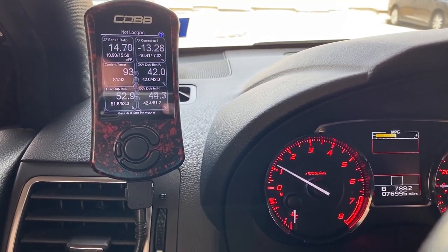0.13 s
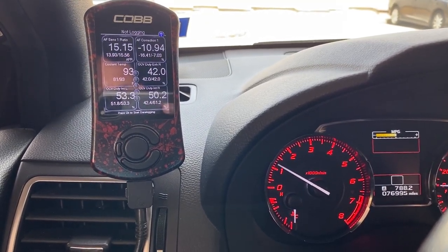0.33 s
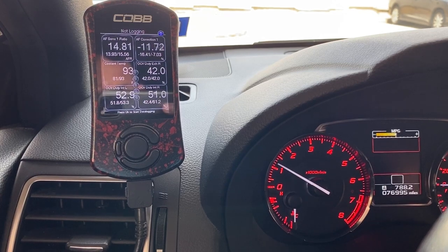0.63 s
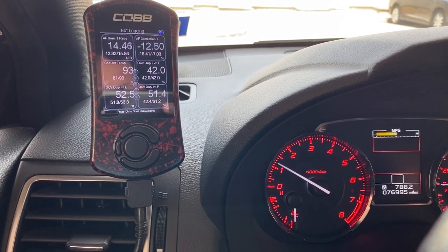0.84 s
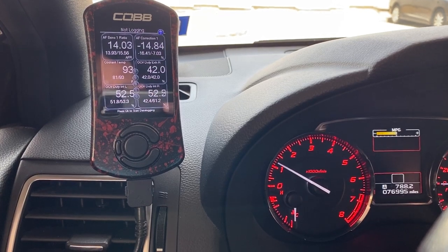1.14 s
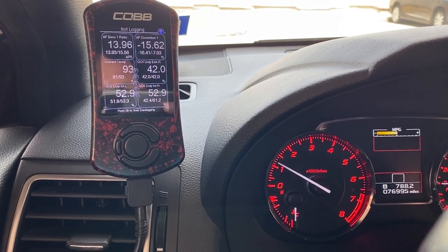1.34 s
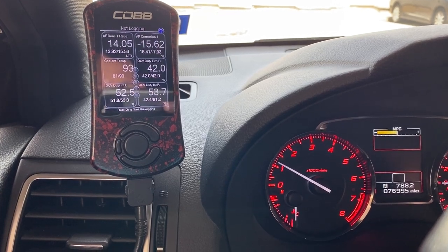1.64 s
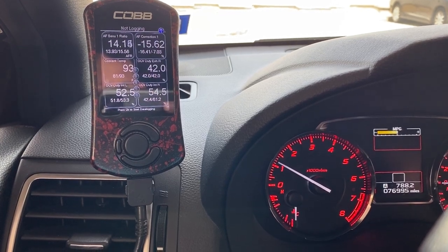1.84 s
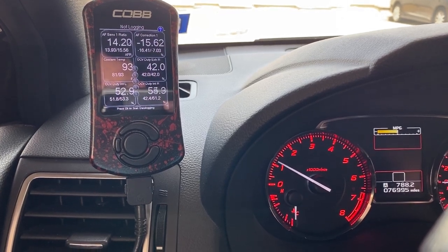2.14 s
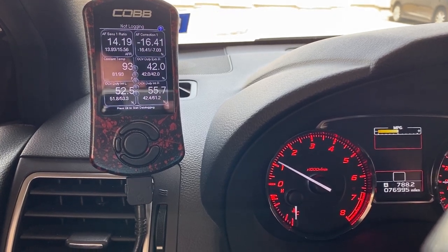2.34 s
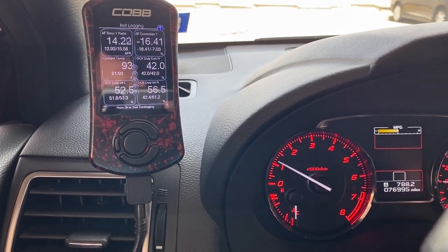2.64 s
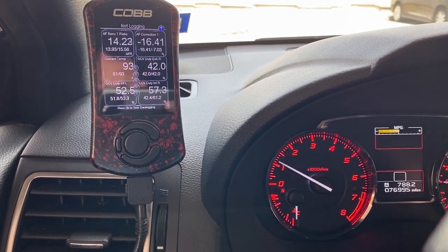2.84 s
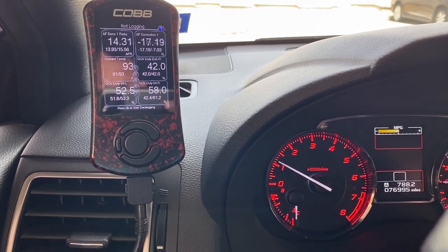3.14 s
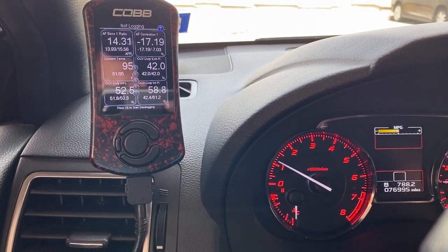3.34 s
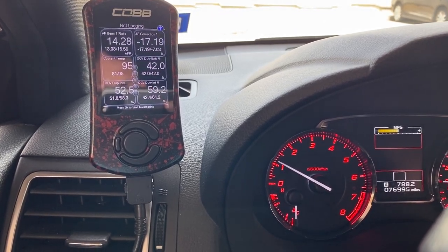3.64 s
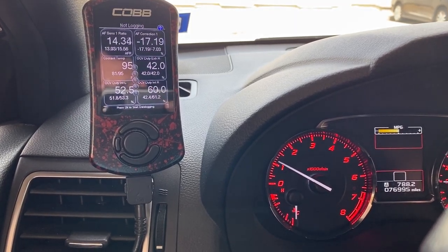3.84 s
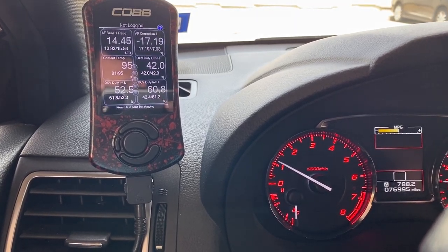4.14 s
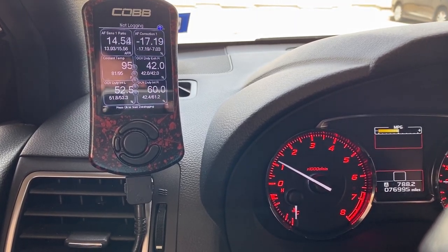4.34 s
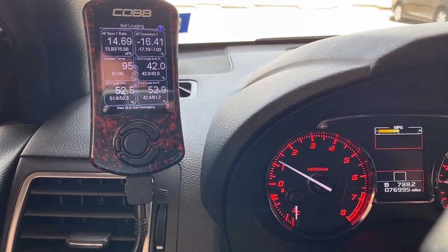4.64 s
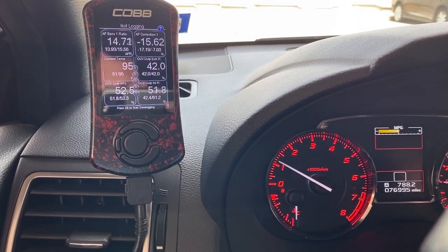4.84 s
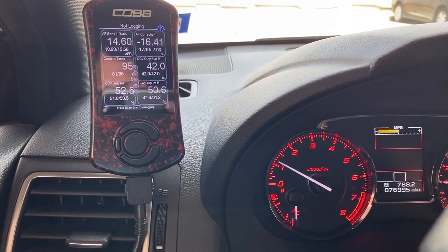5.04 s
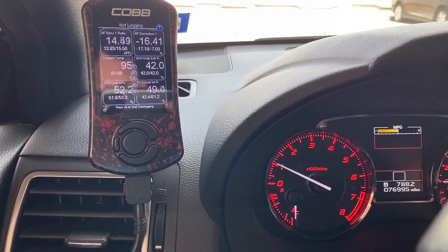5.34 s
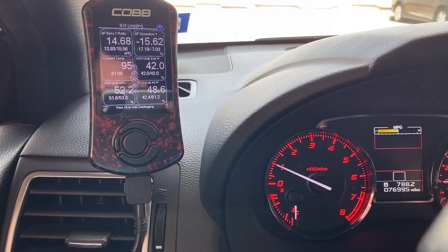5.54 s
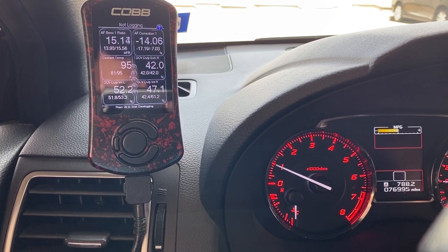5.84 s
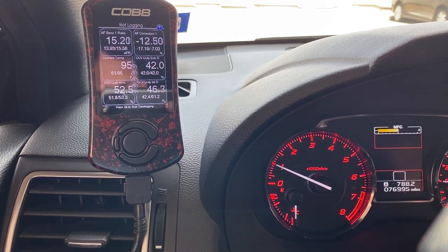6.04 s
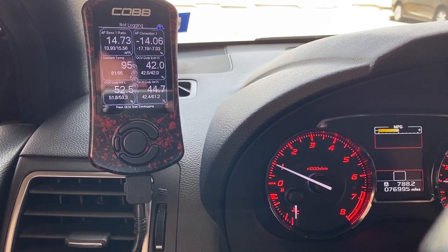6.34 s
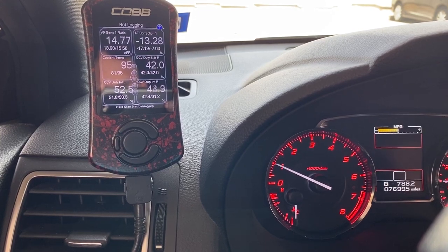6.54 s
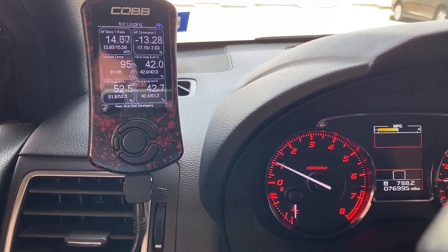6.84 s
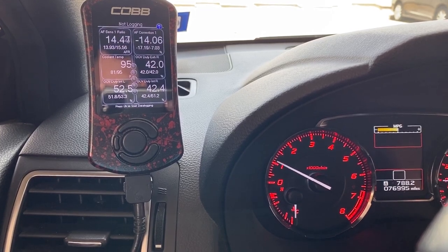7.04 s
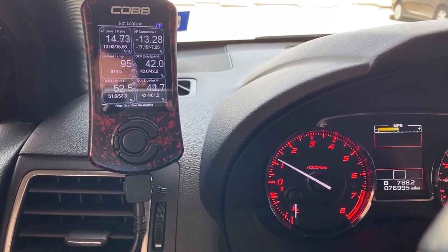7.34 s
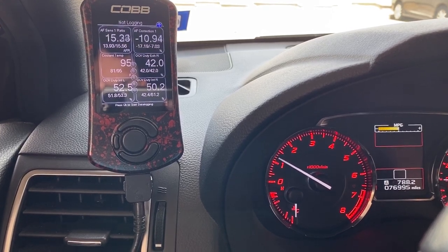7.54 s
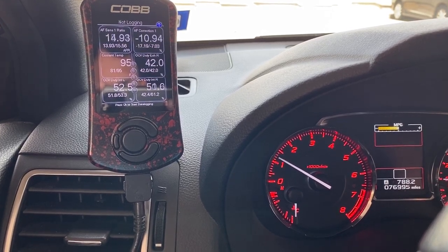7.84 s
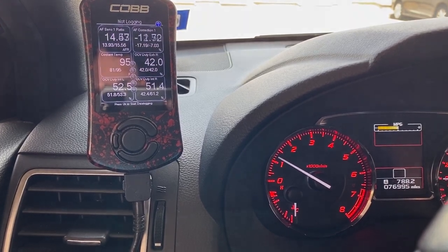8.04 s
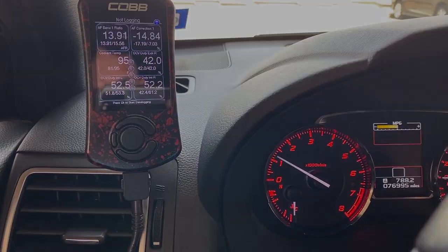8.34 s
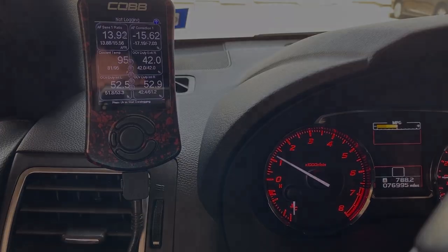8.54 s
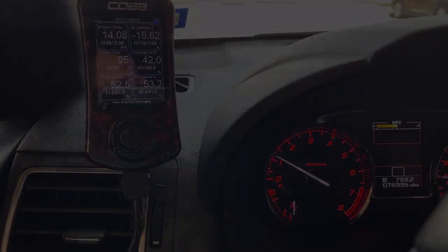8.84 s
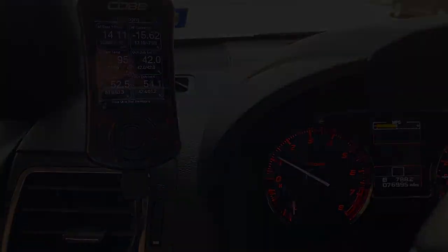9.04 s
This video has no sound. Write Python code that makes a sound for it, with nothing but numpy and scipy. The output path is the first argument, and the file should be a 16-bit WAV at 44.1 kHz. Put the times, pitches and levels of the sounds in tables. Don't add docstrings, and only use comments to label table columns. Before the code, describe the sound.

Inside a parked car, a four-cylinder engine throbs at a fast idle, deep and boomy through the cabin, with knocking, belt whirr, a faint turbo moan and injector ticks ahead. It slowly eases, then around five seconds drops and stumbles unevenly, loose trim buzzing briefly, before catching near seven seconds and steadying. Small birds chirp faintly outside. Phone microphone at the driver's seat.

```python
import sys
import numpy as np
from scipy import signal
from scipy.fft import rfft, irfft
from scipy.io import wavfile
from scipy.ndimage import uniform_filter1d

SR = 44100
rng = np.random.default_rng(int(sys.argv[2]) if len(sys.argv) > 2 else 0)


def nominal_scale(level):
    x = np.asarray(level, float) / 20
    return 10 ** x


def digitize_waveform(pressure):
    field = np.atleast_2d(pressure).T
    bounded = np.clip(field, -1, 1)
    quanta = np.round(bounded * 32767).astype(np.int16)
    wavfile.write(sys.argv[1], SR, quanta)


N = 405279
T = np.arange(N) / SR
LEAD = SR // 5
IDLE_HZ, TURBO_REST_HZ = 39, 550
RATTLE_HZ = 65

# time in seconds, firing rate in Hz.
SPEED = [(0.0, 40.81), (0.3, 40.85), (1.22, 39.29), (1.81, 39.15), (2.24, 38.34), (2.73, 38.94),
         (3.26, 38.32), (3.68, 38.36), (4.49, 39.85), (4.87, 38.86), (5.37, 33.03), (5.55, 32.45),
         (6.21, 33.55), (6.68, 35.21), (7.25, 40.46), (7.58, 41.27), (8.68, 39.07), (9.19, 38.56)]
# time in seconds, combustion effort in dB, roughness 0-1.
LOAD = [(0, 2.5, 0), (.6, 1, 0.5), (1.3, 0.4, .1), (2.3, -0.5, 0.2), (3.4, 0, .15), (4.2, 0.5, 0.1),
        (4.9, 0.5, 0.1), (5.1, 1.5, .75), (5.6, 4, 0.5), (5.9, 4, .55), (6.5, 1.5, 0.7), (7.05, 2.5, 0.8),
        (7.25, 1.5, .05), (7.6, 1, .05), (8, 1.5, .4), (9.19, -0.1, 0.2)]
# time in seconds, loss 0-1.
MISFIRES = [(4.85, 0.5), (5.052, 1), (5.159, 0.96), (5.27, 0.8), (5.511, 1), (5.62, 0.3), (5.76, 0.98),
            (5.87, 0.2), (5.99, 0.5), (6.12, 1), (6.23, 0.65), (6.499, 0.8), (6.93, .4)]
CYLINDERS = [
    0.34,
    -0.24,
    -4.5,
    -1,
]
# frequency in Hz, gain in dB.
EXHAUST_PATH = [(15, -93.5), (28, -54), (36, -37.5), (46, -35.5), (60, -26.5), (90, -31), (140, -32.5),
                (190, -49.5), (260, -62), (450, -65), (700, -73), (1100, -81.5), (3000, -120)]
# frequency in Hz, width in Hz, height in dB (negative = cancellation).
BOOMS = [(39.75, 0.68, -13), (44.3, 1.2, -9), (49.7, 15, 5.5), (55.7, 5.7, 7.5), (70.57, 12, 11),
         (79.67, 5.45, 6), (84.67, 4.1, -7), (126.7, 7, 8.5), (153.94, 10, 15), (159.5, 3, -18.5),
         (170.9, 11.16, 20), (178.1, 8, 6), (201.8, 13.3, 12), (233.54, 10.6, 21.5), (243.6, 2, 9.5),
         (277.8, 16, 12.5), (307.1, 12, 18.5), (347.3, 9.1, 12.5), (361.9, 25, 13.5), (402.9, 26, 19.5),
         (464.3, 8.3, 15.5), (543, 13, 18.5), (585.5, 15, 18), (654, 35, 17.5)]
# trend rows of frequency in Hz, gain in dB;
# then mode rows of frequency in Hz, width in Hz, height in dB.
MOUNTS = [(20, -62.5), (45, -40), (65, -44.5), (100, -80), (400, -130)], [(55.7, 5.7, 17)]
# time in seconds, moan in Hz.
TURBO = [(0, 667), (.35, 680), (1.4, 594), (2.6, 522), (3.6, 499), (6.3, 527.3), (7, 561), (7.35, 639),
         (8, 662), (9.19, 556)]
# frequency in Hz, level in dB per Hz.
WHIRR = [(19, -30), (29, -14.5), (100, -10), (200, -9), (270, -22), (430, -19.5), (700, -22), (1150, -32.5),
         (2070, -34.5), (3300, -40.5), (5500, -44.5), (6800, -55), (11500, -60.5), (15700, -56.5)]
# frequency in Hz, width in Hz, height in dB.
PANELS = [(172, 30, -2.5), (208, 7.3, -6.5), (251.6, 12, -10), (289, 10, -5), (327, 8.3, -9),
          (370, 6.7, -0.5), (444, 19, -14), (483, 15, 5), (519, 17, -7.5), (571.4, 32, 5.5), (634, 13, -5),
          (650, 17, 6), (754, 29, -5), (854, 65, 7), (1002, 42, 9.5), (1283, 100, 4), (1593, 52, 5),
          (1743, 56, 7.5), (1890, 20, 0), (2040, 61, -6.5), (2236, 54, -1.5), (2370, 22, -2),
          (2753, 28, -1.5), (2965, 45, 3.5), (3900, 530, 1), (7070, 44, 3), (7400, 43, 6), (8050, 470, 4),
          (10100, 300, 5)]
KNOCK_LAW = -1.6, 1, 1.2, 0.38
WHIRR_LAW = -56.5, 0.1149, 0.54, 0.0156
MOAN_LAW = -50.5, 0, 1.8, .2
# start in seconds, length in seconds, level in dB.
BUZZES = [(5.039, 0.079, -40.5), (5.15, 0.088, -38), (5.268, 0.055, -38.5), (5.51, 0.025, -47),
          (5.751, 0.045, -38.5), (5.86, 0.045, -48.5), (6.87, .04, -55)]
# frequency in Hz, width in Hz, height in dB.
DASH = [(584, 210, 30), (830, 130, 12.5), (906, 140, 15.3), (996, 49, 24), (1680, 210, 14)]
# frequency in Hz, level in dB.
WHINES = [(5534, -81), (6094, -87), (10013, -86), (15617, -92)]
# start in seconds, length in seconds, start pitch in Hz, end pitch in Hz, level in dB.
CHIRPS = [(0.343, .05, 4550, 4600, -59), (0.405, 0.063, 4250, 4350, -49), (.49, 0.064, 3900, 2950, -58),
          (1.44, 0.068, 4600, 4900, -63), (1.992, 0.073, 4450, 4350, -53), (2.056, .07, 3780, 2930, -56.5),
          (2.17, 0.1, 5100, 5250, -62), (2.235, .09, 4150, 4440, -62), (3.231, 0.079, 4200, 4370, -58),
          (4.62, 0.1, 5300, 5300, -59), (6.10, 0.036, 4100, 5000, -56), (6.134, 0.034, 6300, 5860, -62),
          (6.153, 0.086, 4050, 5630, -66), (6.76, .05, 5500, 4950, -56.5), (6.84, .05, 4400, 5020, -54),
          (6.969, 0.085, 5200, 5264, -62.5), (7.159, 0.046, 4300, 4260, -53), (7.22, .07, 3700, 2770, -60),
          (7.69, 0.044, 4500, 4470, -59), (8.58, .05, 4500, 4500, -62)]


def exhaust(firings, effort_db, rough, knock_db):
    count = np.arange(-6, int(firings[-1]) + 1)
    times = np.interp(count - .49, np.r_[-SPEED[0][1], firings], np.r_[-1, T])
    size_chance, time_chance, knock_chance = rng.standard_normal((len(count), 3)).T
    shake = np.clip(np.interp(times, T, rough), 0, 1)
    cylinder_db = np.array(CYLINDERS)[count % 4]
    effort = np.interp(times, T, effort_db)
    sizes = nominal_scale(effort + cylinder_db * (.5 + 0.95 * shake) + 1.8 * shake * size_chance)
    for at, loss in MISFIRES:
        nearness = np.exp(-((times + 0.013 - at) / 0.015) ** 2)
        sizes = sizes * (1 - np.clip(loss, 0, 1) * nearness)

    strength = sizes / nominal_scale(effort)
    weakness = 1 - strength
    drag = .0013 * shake * (np.roll(weakness, -1) - np.roll(weakness, 1))
    gas_times = times + .0006 * shake * time_chance + drag
    gas = below(colour(firing_pulses(gas_times, sizes), EXHAUST_PATH, BOOMS), 188)
    gas = gas + rocking(times, shake * (strength - np.mean(strength)))

    floor = below(gas, 98)
    gas = gas - floor + np.roll(floor, int(.0013 * SR))

    knock_times = times + (.00005 + .0005 * shake ** 2) * knock_chance
    knock_sizes = nominal_scale(np.interp(times, T, knock_db) + .6 * size_chance + 0.25 * cylinder_db)
    return (gas + block_knock(knock_times, knock_sizes))[LEAD:]


def rocking(times, torque):
    trend, modes = MOUNTS
    return colour(firing_pulses(times, torque), trend, modes)


def block_knock(times, sizes):
    knock = colour(firing_pulses(times, sizes), EXHAUST_PATH, BOOMS)
    return knock - below(knock, 188)


def firing_pulses(times, sizes):
    return clicks(times, sizes * SR / (IDLE_HZ * np.sqrt(2)))


def whirr(firings, level_db):
    noise = colour(rng.standard_normal(N), WHIRR, PANELS)
    noise = noise / np.std(band(noise, 2200, 3400))
    top = above(noise, 12500, 4)
    mid = above(noise - top, 1200, 2)
    low = noise - top - mid
    puff = 1 + 0.092 * np.cos(2 * np.pi * (firings - .3))
    turn = np.cos(np.pi / 2 * (firings - 1.4))
    hiss = nominal_scale(1.5 * turn + 3.0 * np.exp(8.0 * (turn - 1)))
    low = low * puff * nominal_scale(0.55 * walk(5))
    mid = mid * nominal_scale(.5 * walk(9))
    return nominal_scale(level_db) * (low + mid + top * hiss)


def turbo(firings, moan_hz, moan_db):
    pitch_hz = moan_hz + 3.5 * walk(15)
    beat = 1 + .5 * np.cos(2 * np.pi * firings)
    level = nominal_scale(moan_db + walk(2.5) + 2.0 * walk(10))
    return level * beat * np.sin(2 * np.pi * np.cumsum(pitch_hz) / SR)


def injectors(firings):
    count = np.arange(1, 2 * int(firings[-1]))
    sizes = nominal_scale(5.0 * rng.standard_normal(len(count)))
    ticks = clicks(np.interp(count / 2, firings, T), sizes)[LEAD:]
    burst = rng.standard_normal(400) * np.exp(-T[:400] / .0012)
    return nominal_scale(-86.0) * unit(band(signal.fftconvolve(ticks, burst)[:N], 8000, 15500))


def dash():
    at, length, db = np.transpose(BUZZES)[:, :, None]
    since = np.arange(6) / RATTLE_HZ
    chance = rng.standard_normal((len(BUZZES), 2, 6))
    sizes = nominal_scale(db + 2 * chance[:, 0]) * np.exp(-(since / length) ** 2) * np.sqrt(SR / RATTLE_HZ)
    times = at + .002 + since + .0008 * chance[:, 1]
    taps = clicks(times.ravel(), sizes.ravel())[LEAD:]
    jolt = np.zeros(N)
    for start, fade, level_db in BUZZES:
        jolt += nominal_scale(level_db) * (T > start) * np.exp(-np.clip((T - start) / fade, 0, 9) ** 2)
    noise = rng.standard_normal(N)
    trend = [(300, -27.5), (700, -4.0), (2500, -1), (5000, -32)]  # Hz, dB
    return colour(0.95 * taps + 0.37 * jolt * noise, trend, DASH) / np.std(colour(noise, trend, DASH))


def whines():
    return sum(nominal_scale(db + 1.5 * walk(2.6)) * np.sqrt(2) * np.sin(2 * np.pi * hz * T) for hz, db in WHINES)


def birds():
    out = np.zeros(N)
    warble, husk = walk(250), walk(150)
    for at, length, start_hz, end_hz, db in CHIRPS:
        part = slice(int(at * SR), int((at + length) * SR))
        way = (T[part] - at) / length
        hz = start_hz + (end_hz - start_hz) * way + 120 * warble[part]
        shape = np.clip(way / 0.23, 0, 1) * np.clip(1 - way, 0, 1) ** 0.71
        shape = shape * nominal_scale(2.7 * husk[part])
        out[part] += 2 * nominal_scale(db) * shape * np.sin(2 * np.pi * np.cumsum(hz) / SR)
    return reflections(out, 0.05, 2.5)


def reflections(x, decay_s, wet_db):
    tail = rng.standard_normal(SR // 4) * np.exp(-T[:SR // 4] / decay_s)
    wet = signal.fftconvolve(x, tail / np.sqrt(np.sum(tail ** 2)))[:N]
    return (x + nominal_scale(wet_db) * wet) / np.sqrt(1 + nominal_scale(2 * wet_db))


def colour(x, trend, modes):
    size = 2 ** 15
    hz = np.maximum(np.arange(size // 2 + 1) * SR / size, 1)
    trend_hz, trend_db = np.transpose(trend)
    db = np.interp(np.log(hz), np.log(trend_hz), trend_db)
    for mode_hz, width, hump_db in modes:
        db = db + hump_db / (1 + (2 * (hz - mode_hz) / width) ** 2)
    cepstrum = irfft(db * np.log(10) / 20)
    cepstrum[1:size // 2] *= 2
    cepstrum[size // 2 + 1:] = 0
    return signal.fftconvolve(x, irfft(np.exp(rfft(cepstrum))))[:len(x)]


def clicks(times, sizes):
    place = np.clip(times * SR + LEAD, 0, N + LEAD - 2)
    whole = place.astype(int)
    part = place - whole
    return np.bincount(whole, sizes * (1 - part), N + LEAD) + np.bincount(whole + 1, sizes * part, N + LEAD)


def below(x, hz):
    return signal.sosfiltfilt(signal.butter(4, hz, fs=SR, output="sos"), x)


def above(x, hz, order):
    return signal.sosfiltfilt(signal.butter(order, hz, "high", fs=SR, output="sos"), x)


def band(x, lo_hz, hi_hz):
    return signal.sosfilt(signal.butter(2, [lo_hz, hi_hz], "band", fs=SR, output="sos"), x)


def unit(x):
    return x / np.sqrt(np.mean(x ** 2))


def walk(rate_hz):
    k = int(SR / rate_hz)
    steps = np.repeat(rng.standard_normal(N // k + 1), k)[:N]
    return unit(uniform_filter1d(uniform_filter1d(steps, k), k))


def scene():
    speed_hz = np.interp(T, *np.transpose(SPEED))
    moan_hz = np.interp(T, *np.transpose(TURBO))
    firings = np.cumsum(speed_hz) / SR
    caught = np.clip((speed_hz - 36) / 3, 0, 1)
    gain = uniform_filter1d(np.gradient(speed_hz) * SR, SR // 5) * caught
    state = np.array([np.ones(N), speed_hz - IDLE_HZ, (moan_hz - TURBO_REST_HZ) / 100, gain])
    knock_db, whirr_db, moan_db = np.array([KNOCK_LAW, WHIRR_LAW, MOAN_LAW]) @ state
    load_s, load_db, load_rough = np.transpose(LOAD)
    effort_db = np.interp(T, load_s, load_db)
    rough = np.interp(T, load_s, load_rough)

    engine = exhaust(firings, effort_db, rough, knock_db)
    engine = engine + reflections(whirr(firings, whirr_db), .02, -8.0)
    engine = engine + turbo(firings, moan_hz, moan_db) + injectors(firings)
    return (engine + dash() + whines() + birds())[None]


def roll_off(x):
    return signal.sosfilt(signal.butter(12, 16370, fs=SR, output="sos"), x)


def record(dry):
    top_cut = signal.ellip(10, .2, 45, 15700, fs=SR, output="sos")
    return roll_off(signal.sosfilt(top_cut, dry))


dry = scene()
out = record(dry)
digitize_waveform(out)
```